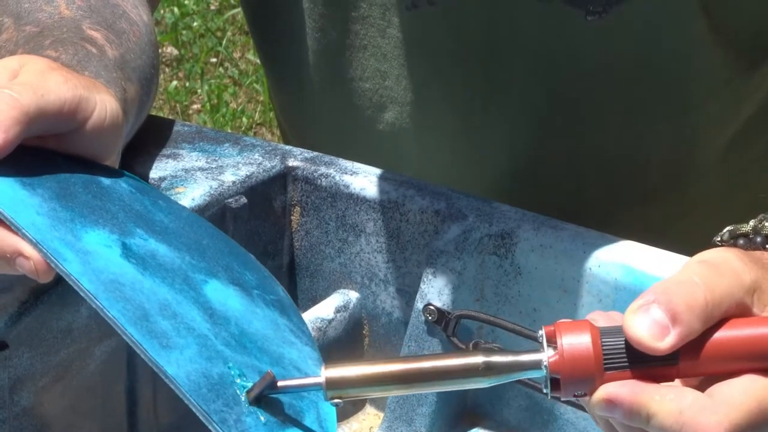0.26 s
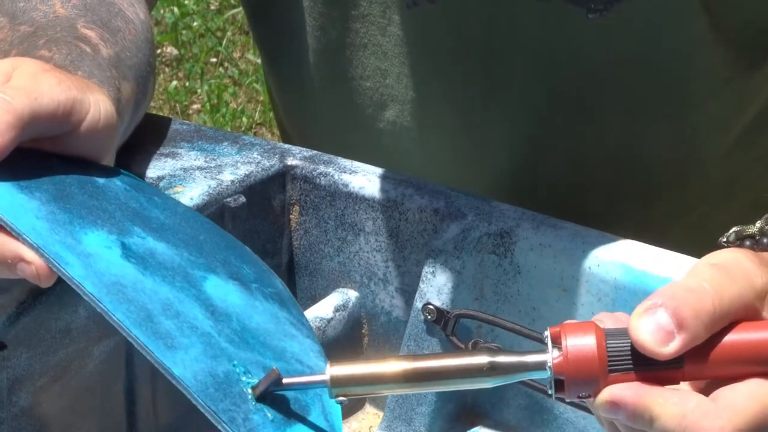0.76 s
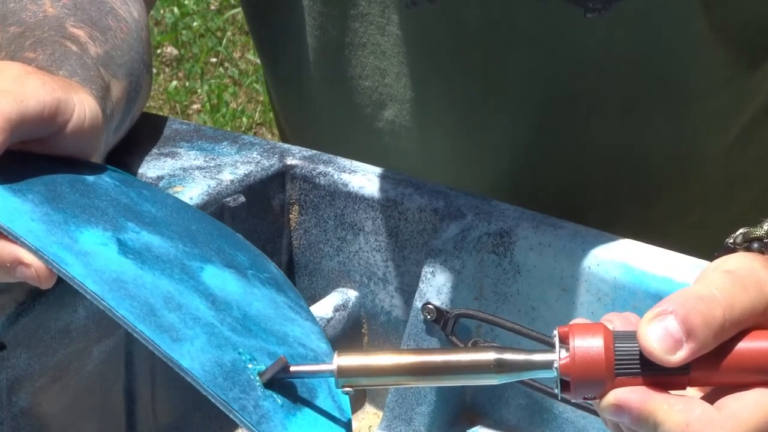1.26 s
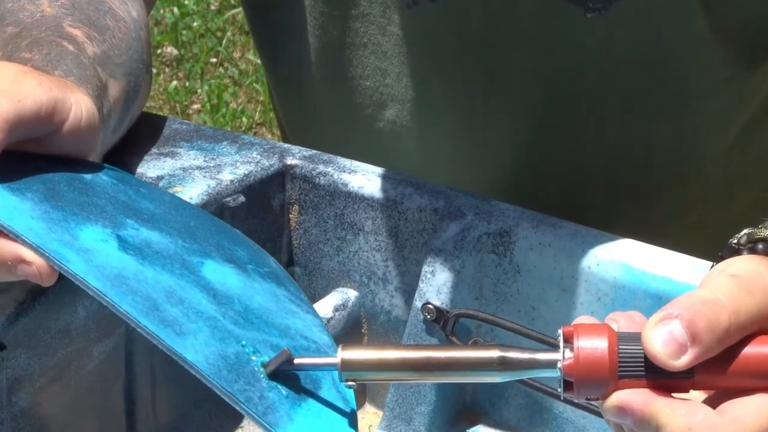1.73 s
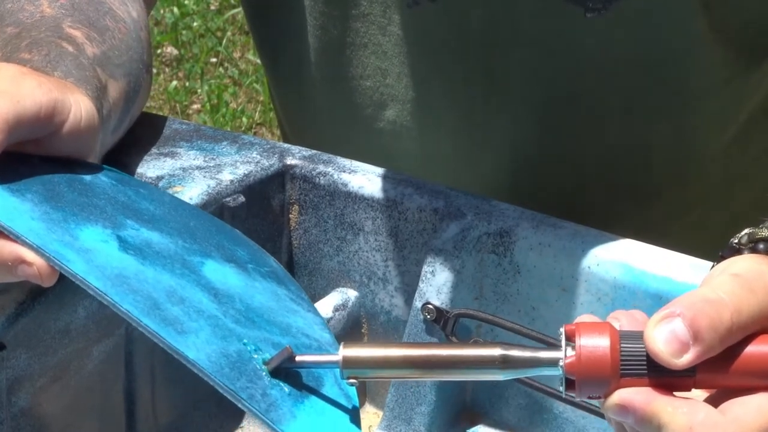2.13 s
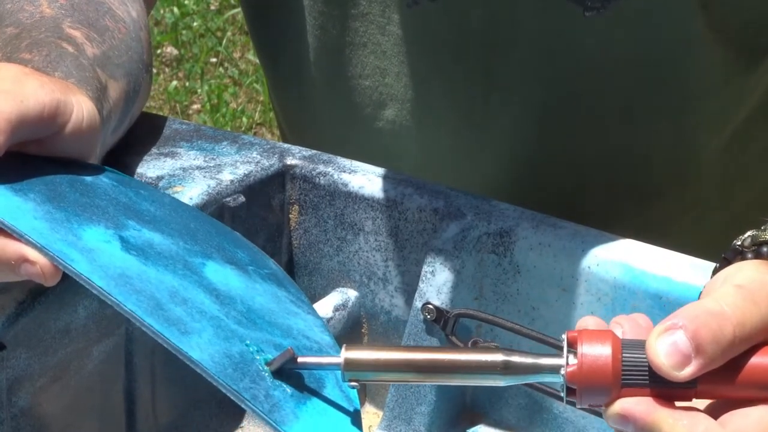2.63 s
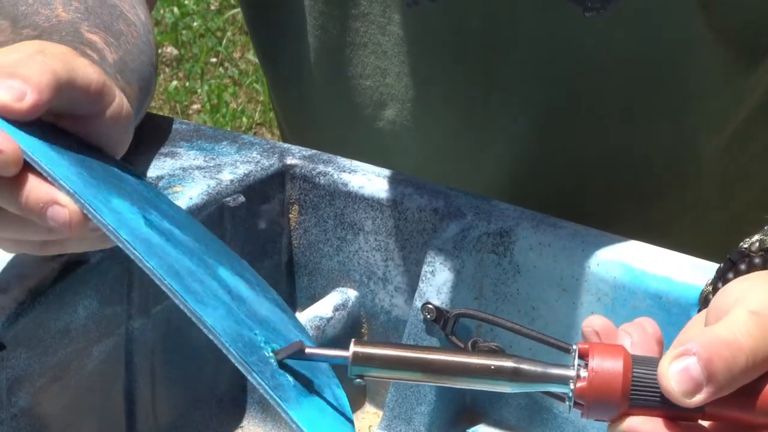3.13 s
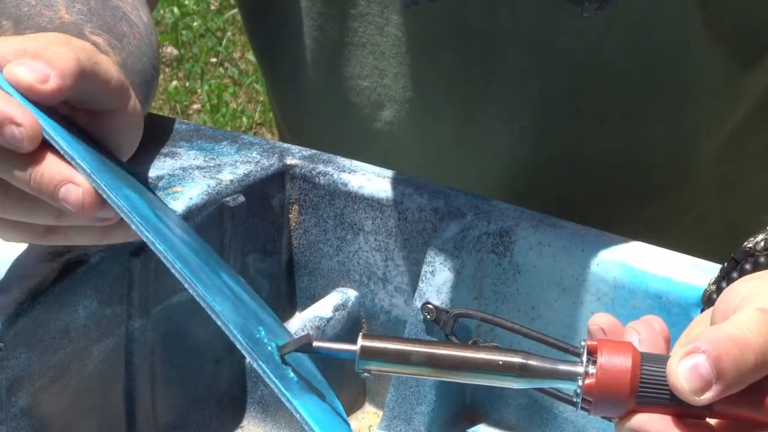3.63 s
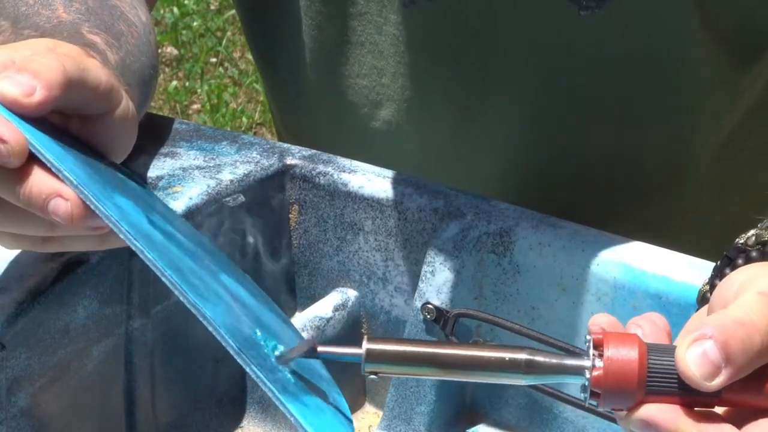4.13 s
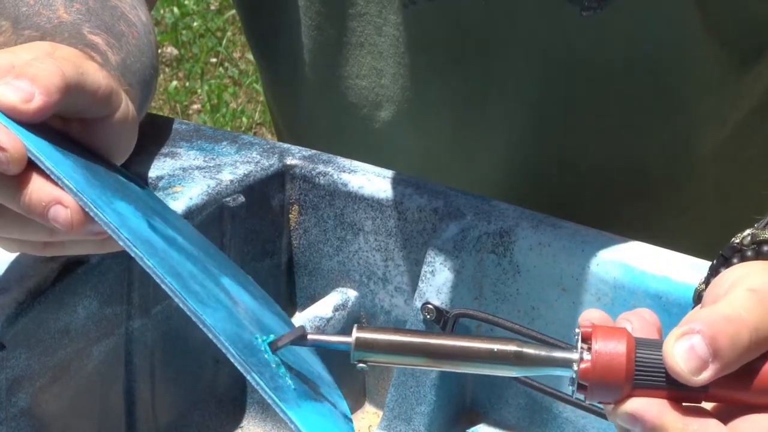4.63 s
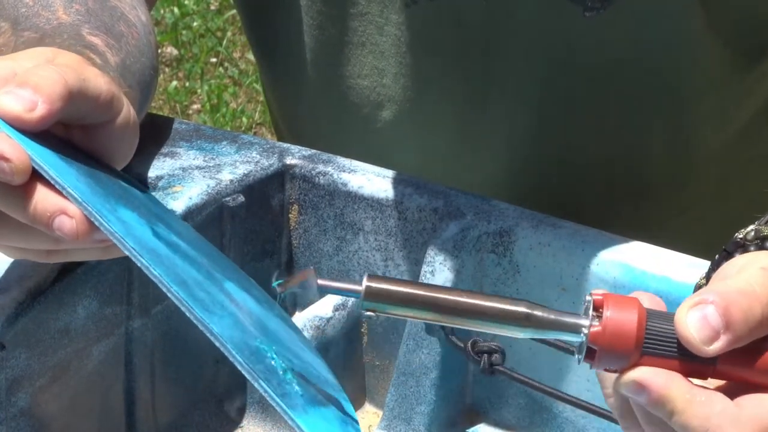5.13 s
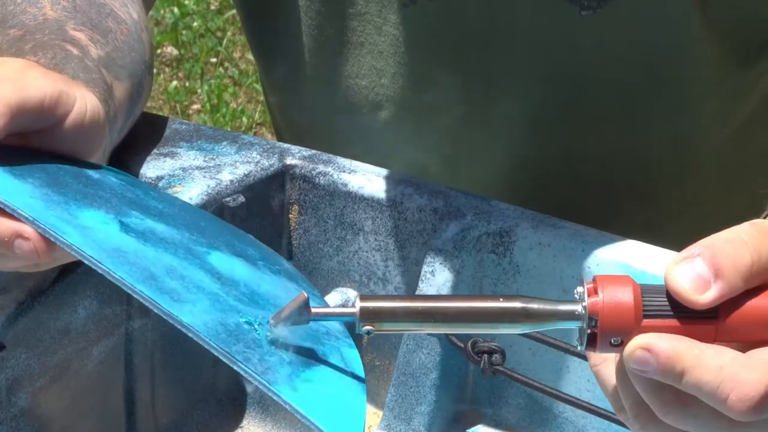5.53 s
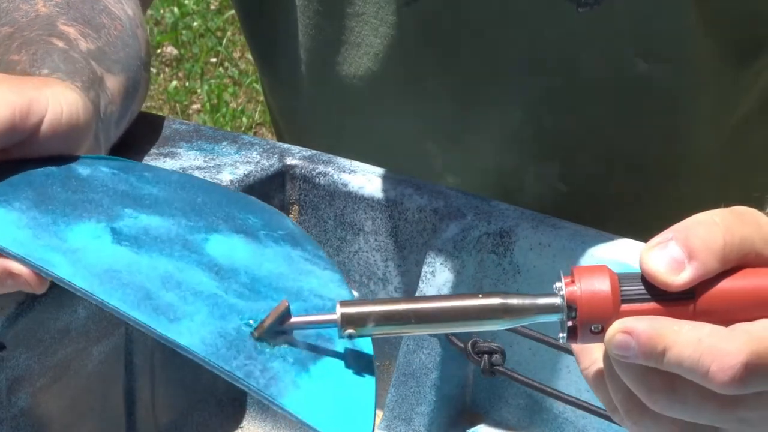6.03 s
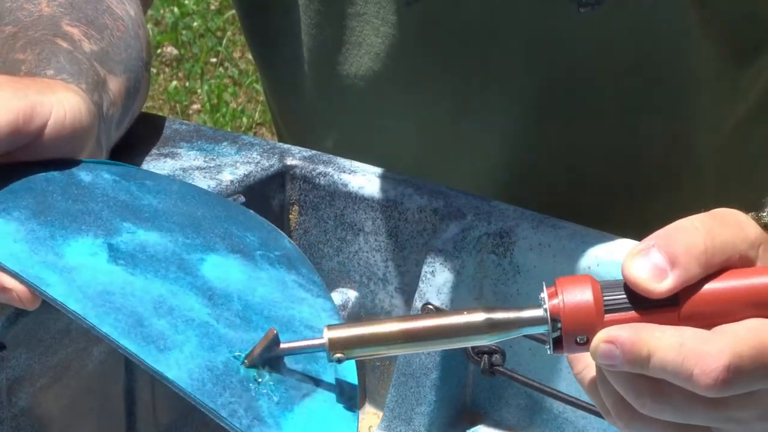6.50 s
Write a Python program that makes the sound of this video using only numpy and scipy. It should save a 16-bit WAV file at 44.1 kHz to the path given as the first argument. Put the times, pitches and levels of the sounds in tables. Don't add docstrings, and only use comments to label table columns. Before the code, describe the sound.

A songbird whistles quick, slurred phrases amid thin high chirps and buzzes in a quiet leafy yard, with one sharp plastic snap midway.

```python
import sys
import numpy as np
from scipy import signal
from scipy.fft import rfft, irfft
from scipy.io import wavfile
from scipy.ndimage import uniform_filter1d

SR = 44100
rng = np.random.default_rng(int(sys.argv[2]) if len(sys.argv) > 2 else 0)


def dump(signal):
    limited = np.clip(np.atleast_2d(signal).T, -1, 1)
    pcm = np.round(limited * 32767).astype(np.int16)
    wavfile.write(sys.argv[1], SR, pcm)


def convert_level_to_amplitude(level_db):
    exponent = np.asarray(level_db, float) / 20
    return 10 ** exponent


N = 298102


def walk(rate, count=N):
    k = int(SR / rate)
    held = np.repeat(rng.standard_normal(count // k + 1), k)
    return 1.252 * uniform_filter1d(uniform_filter1d(held, k), k)[:count]


def add(out, s, x, pan_db):
    i = max(int(s * SR), 0)
    x = np.atleast_2d(x)[:, :N - i]
    out[:, i:i + x.shape[1]] += x * convert_level_to_amplitude(np.array([[pan_db], [-pan_db]]) / 2)


def scatter(t60, gap_s):
    t = np.arange(int(.9 * SR)) / SR
    shared, left, right = rng.standard_normal((3, len(t)))
    build_up = 1 - np.exp(-(t / gap_s) ** 2)
    decay = np.exp(-np.log(1000) * t / t60)
    tail = np.array([shared + 0.36 * left, shared + 0.86 * right]) * decay * build_up
    spectrum = rfft(tail)
    tail = irfft(spectrum / np.sqrt(uniform_filter1d(np.abs(spectrum) ** 2, size=30)), len(t))
    return tail / np.sqrt(np.sum(tail ** 2) / 2)


def hook(s, top, bottom, tail, db, drop, climb, jump_s, shape_db):
    fall_s = (top - bottom) / drop
    start = top * (1 - 0.03 * jump_s / .012)
    times = s + np.array([-jump_s, 0, .42 * fall_s, fall_s, fall_s + tail])
    pitches = [start, top, top - .72 * (top - bottom), bottom, bottom + climb * tail]
    return times, pitches, db + np.array(shape_db)[[0, 1, 2, 2, 3]]


def dip(s, length, edge, turn, db):
    return s + length * np.array([0, .5, 1]), [edge, turn, edge], db + np.array([1.5, -1.5, 1.5])


def slur(s, length, start, end, db, reach, onset_db, fade_db):
    u = np.linspace(0, 1, num=11)
    hz = start + (end - start) * np.clip(u / max(reach, .05), 0, 1)
    return s + length * u, hz, db + np.interp(u, [0, .3, 1], [onset_db, 0, fade_db])


def notes():
    # [top at t/s, top f/Hz, bottom f/Hz, tail/s, level/dB]
    hooks = [
        (.897, 3720, 2047, .05, -48),
    ]
    lazy_hooks = [
        (3.245, 3200, 2200, 0.055, -48),
        (5.31, 3150, 2250, 0.045, -49),
    ]
    # [top at t/s, top f/Hz, bottom f/Hz, tail/s, level/dB]
    steps = [
        (1.05, 3080, 2420, 0.07, -50),
        (1.048, 3080, 2700, .004, -51),
        (2.09, 3400, 2170, 0.08, -48),
        (3.408, 3250, 2930, 0.045, -43.5),
    ]
    # [t/s, length/s, edge f/Hz, turn f/Hz, level/dB]
    dips = [
        (0.9, 0.02, 2820, 2800, -58),
        (3.147, 0.04, 3350, 2800, -52),
        (4.36, 0.05, 3150, 2640, -49),
        (4.448, 0.0265, 3050, 2600, -50),
        (4.476, 0.021, 3100, 2680, -50),
        (6.43, 0.0336, 2750, 2480, -51),
        (5.988, 0.072, 2560, 2250, -52.5),
    ]
    # [t/s, length/s, from f/Hz, to f/Hz, level/dB]
    flicks = [(3.172, .022, 2850, 3200, -50), (.648, 0.014, 3200, 3900, -52),
              (.657, 0.031, 3960, 3115, -54), (0.865, 0.026, 3050, 3480, -51),
              (1.236, 0.038, 2690, 2496, -49.5), (1.868, 0.028, 3040, 3435, -51.5),
              (1.904, 0.019, 3340, 3560, -55.5), (.888, .016, 3700, 3740, -47),
              (2.015, 0.026, 2400, 2450, -61), (2.041, 0.019, 2510, 2620, -47.5),
              (2.062, 0.014, 2650, 3300, -50), (1.028, .018, 2250, 2980, -52),
              (.906, .012, 2500, 3100, -54), (.315, .03, 3150, 2200, -53), (6.452, .014, 2500, 3000, -50),
              (2.355, 0.033, 1790, 1580, -59), (2.442, 0.023, 4000, 3490, -52),
              (2.449, 0.023, 3370, 2600, -50), (2.468, 0.018, 2610, 2410, -48),
              (2.47, 0.029, 3880, 2445, -48.5), (2.509, 0.0505, 2350, 2634, -52.5),
              (2.818, .016, 2780, 2730, -53), (5.487, 0.023, 3120, 3160, -45),
              (3.263, 0.027, 3560, 3490, -51), (3.363, 0.023, 2260, 3090, -52),
              (3.384, .01, 3160, 3170, -46), (3.254, .024, 2790, 3250, -51),
              (3.455, 0.019, 2890, 2760, -42), (4.358, .02, 3190, 3700, -51.5),
              (4.388, .018, 3300, 3080, -46), (3.735, 0.022, 2900, 2700, -48),
              (4.518, 0.012, 2250, 2150, -51), (5.3, 0.03, 3400, 3370, -53), (5.284, .016, 3000, 3380, -50),
              (5.44, 0.045, 2600, 2850, -53), (5.73, 0.022, 3900, 3300, -55),
              (6.466, 0.039, 3020, 2493, -50.5)]
    # [t/s, length/s, from f/Hz, to f/Hz, level/dB]
    slurs = [(0.268, 0.048, 3560, 3540, -58), (0.392, 0.07, 2680, 2850, -51), (.452, .045, 2860, 2880, -50),
             (.972, .026, 2250, 2340, -51), (.77, 0.061, 672, 667, -53.5), (.822, 0.016, 3050, 3110, -53),
             (.196, .018, 3080, 3050, -59), (2.125, .035, 3370, 3350, -55), (2.074, .03, 3330, 3380, -52),
             (1.274, .014, 2600, 2680, -52), (5.6, .02, 2900, 2880, -53), (1.256, 0.075, 2700, 2000, -51.5),
             (1.262, .016, 2560, 2500, -50), (1.32, .03, 1990, 1940, -58), (2.859, .016, 2420, 2400, -60),
             (2.902, .016, 2350, 2430, -59), (4.1, .12, 2690, 3145, -51), (6.512, .02, 2530, 2470, -54),
             (4.7, 0.46, 1665, 1677, -62.5), (5.525, 0.055, 2900, 2820, -50)]
    # [t/s, length/s, from f/Hz, to f/Hz, level/dB]
    burrs = [(0.311, 0.07, 2450, 2560, -49.5), (0.629, 0.05, 3800, 3740, -52),
             (3.192, 0.0546, 3600, 3750, -54), (2.628, 0.056, 2650, 2880, -55.5),
             (2.75, .06, 2780, 2860, -61), (2.418, .03, 2900, 3300, -56), (4.37, 0.035, 3500, 3500, -52),
             (4.447, 0.043, 3500, 3300, -52.5), (4.575, .06, 3800, 3800, -59), (4.54, .1, 2950, 3050, -55),
             (3.5, .1, 2950, 3000, -56), (.805, .04, 2700, 2800, -58), (5.262, 0.035, 2750, 2750, -51),
             (5.44, .11, 2550, 2750, -55), (4.41, .04, 3050, 2950, -52), (6.43, .03, 3600, 3500, -55),
             (5.271, 0.0436, 2780, 3100, -49.5), (6.279, 0.0704, 3850, 3700, -53),
             (6.5, .035, 2650, 2500, -52), (6.54, .07, 2700, 2750, -59), (6.365, .06, 4500, 3900, -54.5),
             (5.63, 0.075, 2950, 2850, -57)]
    # [t/s, length/s, from f/Hz, to f/Hz, level/dB]
    seeps = [(0.52, 0.04, 4900, 4880, -51), (.564, .045, 4870, 4860, -50), (0.75, 0.07, 5840, 5880, -62),
             (4.705, .045, 4600, 4600, -57), (2.055, 0.15, 5250, 5330, -59),
             (2.345, 0.076, 7400, 7250, -63), (3.659, 0.055, 5850, 6100, -63)]
    # [t/s, length/s, from f/Hz, to f/Hz, level/dB]
    trill = [
        (1.725, 0.28, 6780, 7050, -59.5),
    ]
    # [t/s, length/s, from f/Hz, to f/Hz,
    # level/dB]
    hoarse = [(2.9, .18, 5200, 5400, -60.5), (3.225, .016, 4450, 4500, -55), (3.215, .032, 3800, 4000, -52),
              (3.115, .016, 4750, 4750, -51), (3.395, .018, 3500, 3600, -50), (.06, .09, 3000, 2950, -59),
              (2.551, .068, 2850, 2880, -48.5), (2.66, .024, 2800, 2900, -53),
              (6.28, .035, 3260, 3280, -53), (6.335, .025, 3280, 3260, -52), (5.99, .02, 2520, 2450, -52),
              (5.84, .018, 4400, 4450, -57), (5.89, .02, 5050, 5250, -58), (.014, .022, 3050, 2830, -52),
              (4.38, .018, 4150, 4120, -57), (4.5, .018, 4200, 4600, -57), (1.84, .025, 3600, 3750, -61.5),
              (1.912, .022, 4400, 4500, -53), (5.8, .03, 2320, 2320, -58), (5.75, .02, 2650, 2750, -58),
              (2.065, .04, 5570, 5550, -57), (5.215, .04, 3580, 3800, -54), (4.59, .04, 3800, 3800, -57),
              (5.355, .03, 3300, 3250, -56)]
    # [t/s, length/s, from f/Hz, to f/Hz,
    # level/dB]
    scrapes = [(5.854, .03, 3450, 4900, -54.5), (.282, .022, 3300, 2450, -55.5),
               (.35, .04, 2400, 2650, -52), (.838, .02, 2900, 2550, -53), (5.247, .018, 3800, 2760, -52),
               (4.498, .028, 3450, 2200, -49), (4.51, .02, 3350, 2650, -50), (4.53, .045, 2950, 3800, -51),
               (6.338, .026, 3800, 4750, -56), (6.414, .017, 3450, 2640, -50),
               (1.962, .024, 4600, 3900, -53), (.325, .025, 2900, 2150, -52),
               (4.465, .025, 5100, 4500, -56), (5.825, .028, 3800, 4600, -57)]
    # [t/s, length/s, from f/Hz, to f/Hz, level/dB]
    chatter = [(0.69, 0.05, 4400, 5200, -56), (1.973, 0.055, 4500, 3890, -53), (.001, .03, 6300, 6000, -58),
               (4.575, .055, 4950, 4450, -53), (4.64, .17, 4600, 4500, -57), (3.31, 0.045, 4700, 4500, -57),
               (3.587, 0.19, 4540, 4120, -59), (3.62, .04, 4870, 4670, -55.5),
               (3.99, 0.06, 4730, 5400, -62), (4.314, 0.065, 4800, 4500, -53), (4.48, .04, 4900, 4400, -56),
               (5.684, .04, 5060, 4900, -60), (6.717, 0.031, 5410, 4360, -51)]
    clear, burred, thin = (30, 87.6, 0.45), (53, 93, 5.5), (49, 100, 0.38)
    wavering, buzzy = (-48.5, 110, 1.7), (60, 99, 6.56)
    raspy = (56, 96, 1.8)

    sung = [(hook(*n, 42000, 6400, .006, (12.0, 3.5, -2.5, -5.5)), clear) for n in hooks]
    sung += [(hook(*n, 22500, 6400, .004, (1.5, 2.5, -2.0, -3)), clear) for n in lazy_hooks]
    sung += [(hook(*n, 42000, 1200, .012, (0, 1.5, -2.0, -4)), clear) for n in steps]
    sung += [(dip(*n), clear) for n in dips]
    # share of the note spent gliding, onset dB, closing dB
    for table, voice, shape in [(flicks, clear, (0.96, -1.5, 0)), (slurs, clear, (0.392, -1.1, -6)),
                                (burrs, burred, (0.602, -0.5, -3.0)), (seeps, thin, (0.288, -6, -10.5)),
                                (trill, wavering, (1.0, -1.7, -2)), (hoarse, raspy, (.4, -3, -5)),
                                (scrapes, raspy, (.97, -1.5, -1.5)), (chatter, buzzy, (0.59, -2.5, -9.0))]:
        sung += [(slur(*n, *shape), voice) for n in table]
    return sung


def birds():
    # [t/s, left minus right/dB, added distance/m]
    flock = [
        (0, -3, -8),
        (1.3, -3, -8),
        (2.0, 0, -4),
        (3.3, 0, 0),
        (3.6, 3, 12),
        (5.6, 3, 16),
        (6.0, 0, 12),
        (6.76, 1, 18),
    ]
    flock_s, flock_pan_db, flock_away_m = np.transpose(flock)
    direct, send = np.zeros((2, N)), np.zeros((2, N))
    trees = scatter(.56, 0.012)
    for (s, hz, db), (lag_us, metres, flutter_pct) in notes():
        pan_db = np.interp(s[0], flock_s, flock_pan_db)
        away = np.interp(s[0], flock_s, flock_away_m)
        metres = metres + away
        flutter_pct = flutter_pct + 0.035 * max(away, 0)
        t = np.arange(s[0] - .003, s[-1] + .004, 1 / SR)
        flutter, waver, sway, wander = (walk(rate, count=SR // 2)[:len(t)] for rate in (700, 70, 170, 80))
        pitch = uniform_filter1d(np.interp(t, s, hz), size=200)
        pitch = pitch * (1 + 1.23 * flutter_pct / 100 * flutter + .2 / 100 * wander)
        edge = np.clip(np.minimum(t - t[0], t[-1] - t) / .009, 0, 1)
        level = np.sqrt(2) * edge * convert_level_to_amplitude(np.interp(t, s, db) + 1.6 * waver)
        phase = 2 * np.pi * np.cumsum(pitch) / SR
        lag = np.pi * pitch * lag_us / 1e6
        add(direct, t[0], level * np.sin([phase - lag, phase + lag]) * 100 / max(metres, 30), pan_db)
        phase = phase + 2 * sway
        add(send, t[0], level * np.sin([phase - lag, phase + lag]) * max(metres, 0) / 100, 0)
    echoes = signal.fftconvolve(send, trees, axes=1)[:, :N]
    return convert_level_to_amplitude(-1.1) * direct + convert_level_to_amplitude(-1.1) * echoes


def ring(hz, t60, rise_s, length_s):
    t = np.arange(int(length_s * SR)) / SR
    return np.sin(2 * np.pi * hz * t) * np.exp(-np.log(1000) * t / t60) * (1 - np.exp(-t / rise_s))


def sheet():
    # [t/s, peak level/dB, left minus right/dB]
    snap = [
        (3.8172, -32, 0),
        (3.8184, -13.2, 2),
        (3.8229, -25, 0),
        (3.8305, -31, 0),
        (3.8337, -27, 1),
    ]
    # [f/Hz, level/dB, t60/s]
    modes = [(680, -6, 0.011), (1203, -8.5, 0.041), (1763, 5, 0.0095), (2300, -1.5, 0.013),
             (2960, -9, 0.014), (3740, -15, 0.011), (4440, -15.5, 0.011), (5770, -10, 0.0044),
             (6600, -19, 0.0078), (9200, -29, 0.011), (10300, -30, 0.0052), (7880, -24, 0.0074)]
    # [t/s, peak level/dB, f/Hz]
    ticks = [
        (4.2572, -38, 4800),
        (4.0344, -48, 5200),
    ]
    out = np.zeros((2, N))
    for k, (s, db, pan_db) in enumerate(snap):
        dull_db = 2.5 * max(k - 1, 0)
        hit = 0
        for m, (hz, mode_db, t60) in enumerate(modes):
            gain = (-1) ** m * convert_level_to_amplitude(mode_db - dull_db * abs(np.log2(hz / 1600)))
            hit = hit + gain * ring(hz, t60, .0007, .08)
        add(out, s, convert_level_to_amplitude(db) * hit / np.abs(hit).max(), pan_db)
    near = signal.fftconvolve(out, scatter(.1, .012), axes=1)[:, :N]
    far = signal.fftconvolve(out, scatter(.4, .03), axes=1)[:, :N]
    out = out + convert_level_to_amplitude(-17) * near + convert_level_to_amplitude(-23) * far
    for s, db, hz in ticks:
        add(out, s, convert_level_to_amplitude(db) * ring(hz, .008, .0005, .03), 0)
    return signal.sosfilt(signal.butter(2, 330, "high", fs=SR, output="sos"), out)


def bumps():
    # [t/s, peak level/dB, left minus right/dB]
    touches = [(0.631, -74, 4), (0.848, -65, -3), (1.079, -79, -5), (1.229, -77, -3), (1.289, -75, 8),
               (1.34, -78, 3), (1.409, -80, 0.5), (1.975, -70, 4), (5.634, -79, -3.0), (5.699, -83, -3)]
    out = np.zeros((2, N))
    low = signal.butter(2, [62, 200], "band", fs=SR, output="sos")
    t = np.arange(int(.1 * SR)) / SR
    for s, db, pan_db in touches:
        thud = signal.sosfilt(low, rng.standard_normal(len(t)) * t * np.exp(-t / 0.013))
        add(out, s, convert_level_to_amplitude(db) * thud / np.abs(thud).max(), pan_db)
    return out


def hiss(spectrum, db, swell):
    hz = np.fft.rfftfreq(N, 1 / SR) + 1
    points, gains = np.transpose(spectrum)
    noise = rfft(rng.standard_normal(N)) * convert_level_to_amplitude(np.interp(np.log(hz), np.log(points), gains))
    half_octave = 2 * np.log2(hz / 20)
    fade = 2.5 * np.linspace(.5, -.5, N)
    out = np.zeros(N)
    for k in range(20):
        band = irfft(noise * np.clip(1 - np.abs(half_octave - k), 0, 1), N)
        out += band * convert_level_to_amplitude(.4 * swell + .7 * walk(6) + fade * (k / 19) ** 2)
    return out * convert_level_to_amplitude(db) / np.sqrt(np.mean(out ** 2))


def air():
    # [f/Hz, level/dB per Hz]
    air_mid = [(12, -71), (20, -45.5), (226, -22.5), (354, -12), (569, -7), (780, -0.5), (1470, -2),
               (1960, 0.5), (3410, -3), (9800, -22.5), (10900, -25), (14200, -59), (22000, -120)]
    air_side = [(12, -74), (20, -39), (156, -36), (393, -17), (684, -8), (1220, -5.5), (2490, -5.5),
                (4560, -7), (6600, -11), (9800, -21), (10900, -24.5), (14200, -47), (22000, -120)]
    # [f/Hz, left minus right/dB]
    shade = [(300, .7), (1400, 1.4), (3000, 1), (5000, .2), (6800, -.5), (10000, -1.8)]
    # [f/Hz, level/dB rms]
    hum = [
        (120, -103),
        (404, -86),
    ]
    swell = walk(0.99)
    mid, side = hiss(air_mid, -54.5, swell), hiss(air_side, -58, swell)
    t = np.arange(N) / SR
    for hz, db in hum:
        mid = mid + np.sqrt(2) * convert_level_to_amplitude(db + 3.4 * walk(3.22)) * np.sin(2 * np.pi * hz * t)
    shade_hz, shade_db = np.transpose(shade)
    pan_db = np.interp(np.log(np.fft.rfftfreq(N, 1 / SR) + 1), np.log(shade_hz), shade_db)
    return irfft(rfft([mid + side, mid - side]) * convert_level_to_amplitude(np.array([pan_db, -pan_db]) / 2), N)


def scene():
    return birds() + sheet() + bumps() + air()


def low_pass(x):
    return signal.sosfilt(signal.butter(12, 11040, fs=SR, output="sos"), x)


def record(dry):
    cut = signal.sosfilt(signal.ellip(10, .2, 60, 11000, fs=SR, output="sos"), dry)
    return low_pass(cut)


dry = scene()
out = record(dry)
dump(out)
```